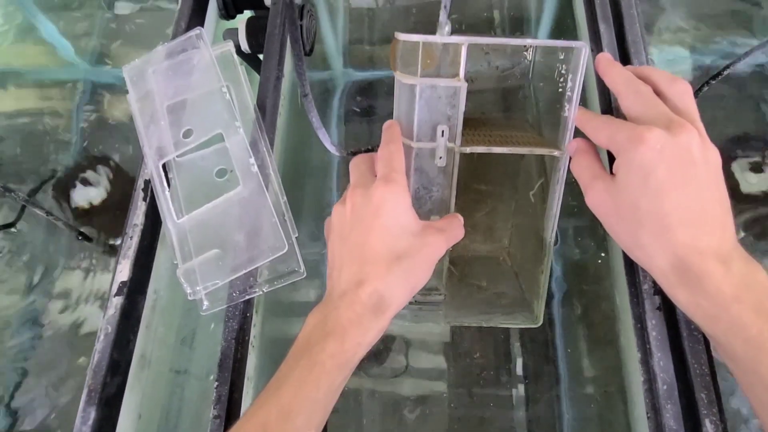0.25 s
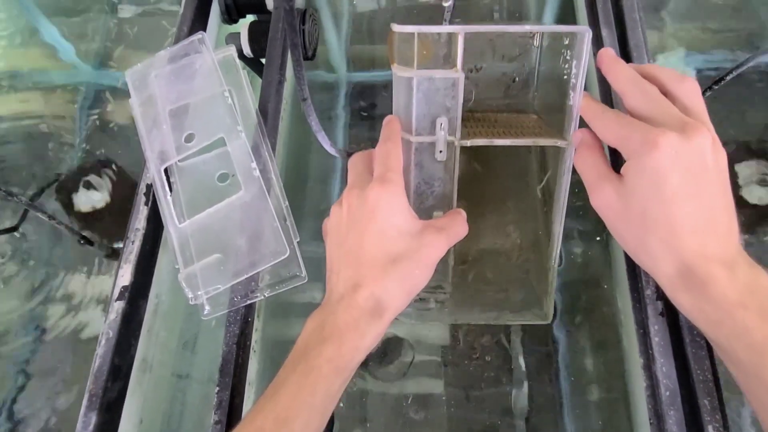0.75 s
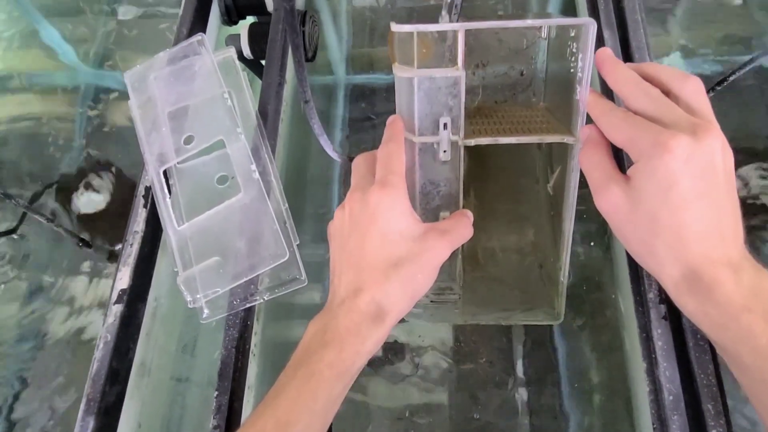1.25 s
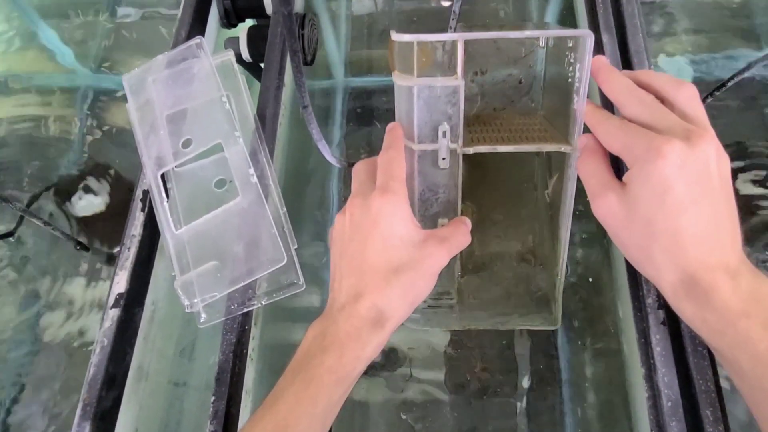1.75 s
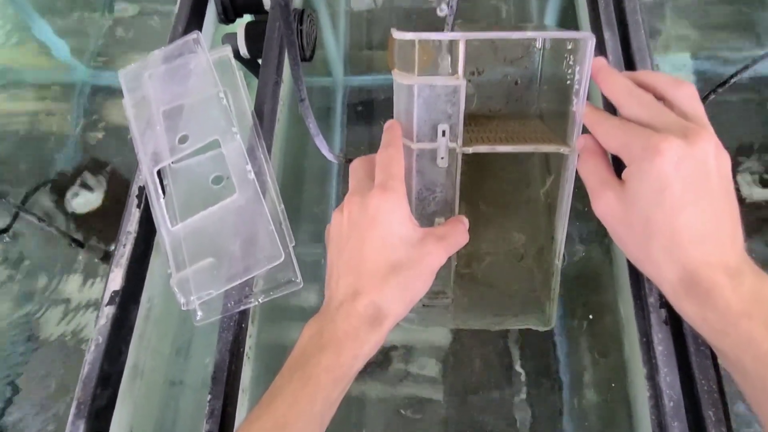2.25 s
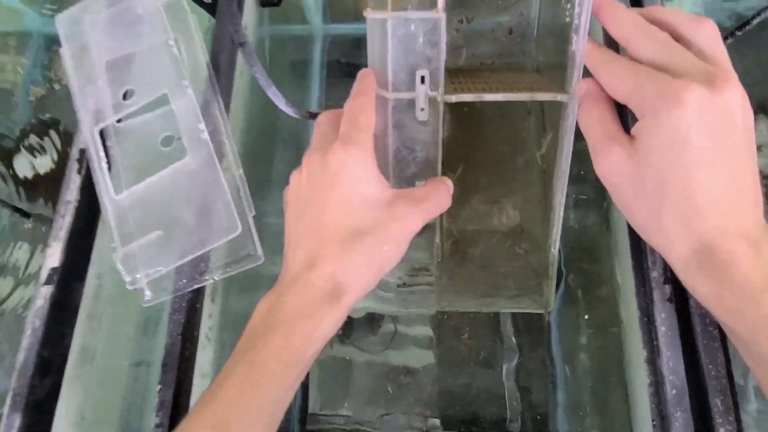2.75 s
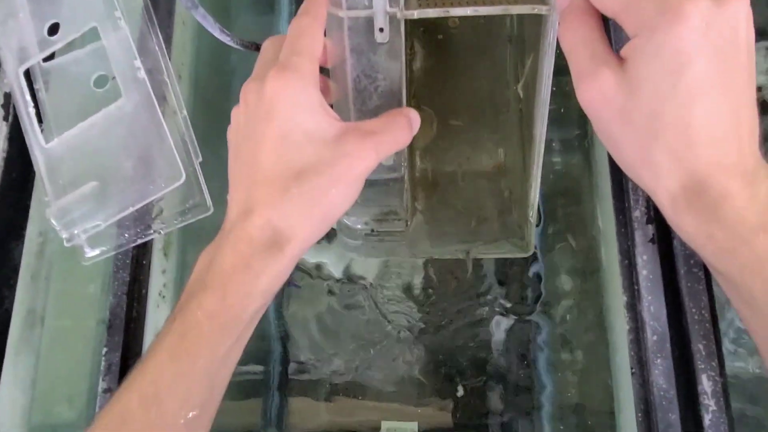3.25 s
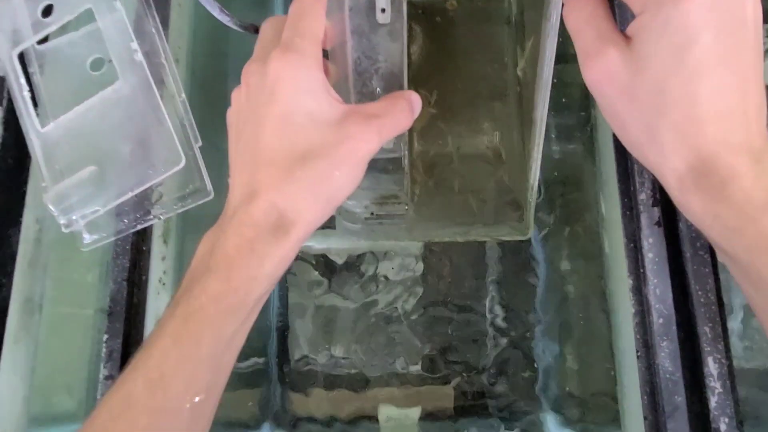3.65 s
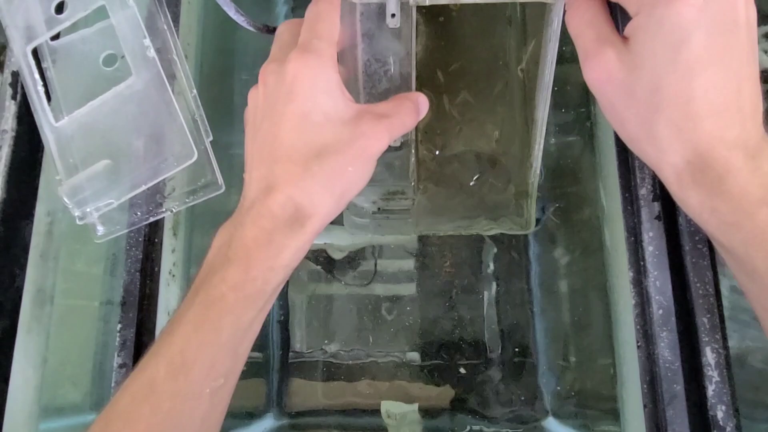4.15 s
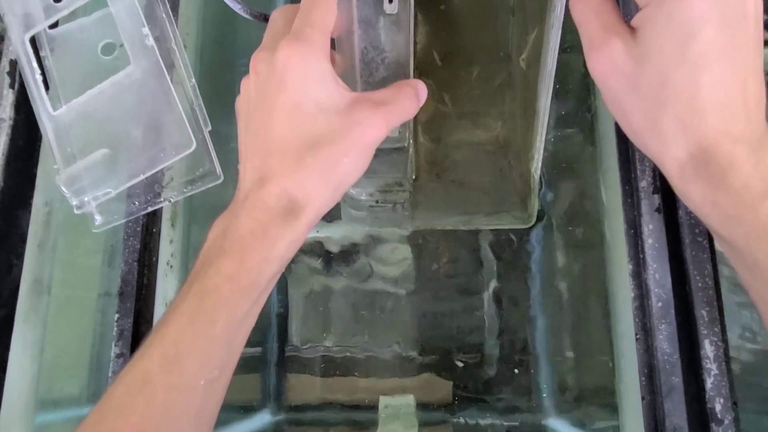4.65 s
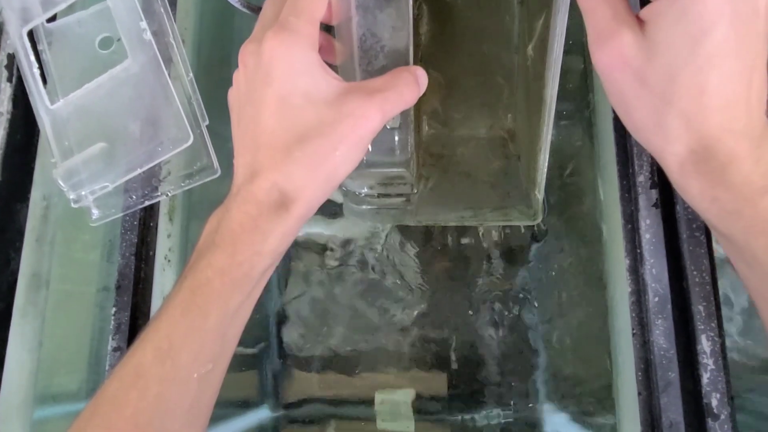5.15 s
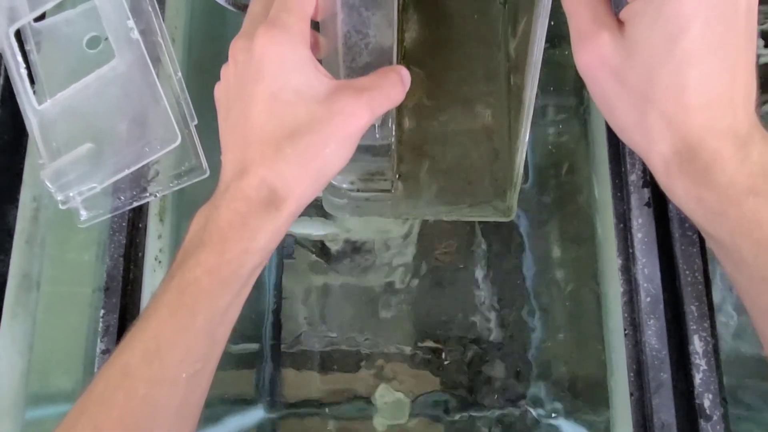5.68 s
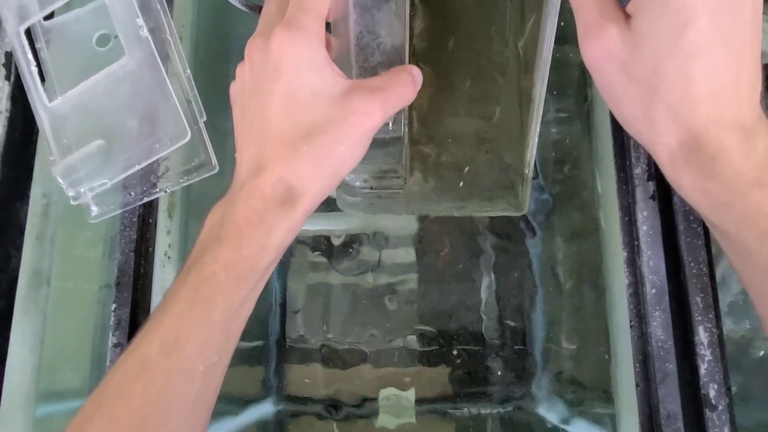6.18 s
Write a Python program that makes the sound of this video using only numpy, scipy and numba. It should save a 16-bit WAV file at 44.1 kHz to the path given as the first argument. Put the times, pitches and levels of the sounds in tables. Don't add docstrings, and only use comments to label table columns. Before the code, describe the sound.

Indoor fish room, stereo handheld microphone near the water. Sputtering gurgles come in short surges with gaps, ringing hollow like air in a pipe, mixed with glugs, plops, slaps and fine ticking spray. After a loud plink and a short near-pause, longer bubbling surges take over and the stream settles, slightly duller as the microphone turns. A constant low machine rumble and soft hiss of distant running tanks lie underneath.

```python
import sys
import numpy as np
from scipy import signal
from scipy.fft import rfft, irfft, next_fast_len
from scipy.io import wavfile
from scipy.ndimage import uniform_filter1d, map_coordinates
from numba import njit

SR = 44100
rng = np.random.default_rng(int(sys.argv[2]) if len(sys.argv) > 2 else 0)


def magnitude_from_level(level_db):
    exponent = np.asarray(level_db, float) / 20
    return 10 ** exponent


def transcribe(u):
    v = np.clip(np.atleast_2d(u).T, -1, 1)
    q = np.round(v * 32767).astype(np.int16)
    wavfile.write(sys.argv[1], SR, q)


N = 283122

# f/Hz, level/dB [per Hz]
ROOM_SPECTRUM = [(88, -53), (150, -19.5), (244, -1), (450, -3.5), (700, -7), (1300, -4), (3500, -14.5),
                 (4500, -21), (5200, -19.5), (7200, -15.5), (10500, -24.5), (12000, -20.5), (13500, -23),
                 (15600, -27)]
# f/Hz, level/dB [per Hz]
RUMBLE_SPECTRUM = [(12, -47), (20, -8), (32, -10), (51, -1), (65, 8.5), (92, 0.5), (117, 0.5), (146, -4),
                   (200, -5), (260, -58), (440, -120)]
# t/s, level/dB
RUMBLE_LEVEL = [(0, -43), (2.8, -41.5), (3.2, -41), (6.42, -41)]
# f/Hz, left-right likeness [-1 to 1]
LIKENESS = [(60, 1), (130, 0.88), (290, 0.89), (640, 0.29), (1410, -1.28), (3100, 0.56), (6820, 0.0093),
            (15000, 0.016)]
# f/Hz, width/Hz, level/dB
MACHINE_TONES = [(59, 1.05, -71), (66.3, 4.76, -53), (115.1, 1.6, -55), (240, 5.71, -56.5)]
# f/Hz, decay time by 60 dB/s
DECAY_TIMES = [(500, 0.46), (2000, 0.25), (8000, 0.02)]
# t/s, extra left lag/samples
CAMERA_TURN = [
    (0, 3.5),
    (2.2, 3.5),
    (3.1, -.5),
    (6.42, -.5),
]
# f/Hz, left lead/rad
PORT_PHASE = [(0, 0), (600, .5), (950, -.3), (1040, 0), (1120, 1.8), (1300, 1.9), (1720, .9), (2410, 2.8),
              (2760, 3.4), (3190, 3.3), (4130, 5.9), (4650, 6.5), (5080, 7.5), (9000, 9)]
# f/Hz, left-right level/dB
BODY_SHADING = [(600, -3), (1100, 0), (2000, -1), (8000, -2)]
# start t/s, length/s, gurgle level/dB, mouth opening as upper-mode level/dB
SURGES = [(0.0, 0.091, -25, -6.5), (0.121, 0.193, -25.5, -9), (0.361, 0.05, -21.5, -21),
          (0.433, 0.062, -44, -25), (.675, .13, -21.5, -13), (0.828, 0.25, -22, -12),
          (1.119, 0.14, -36, -26.5), (1.36, 0.15, -26, -22), (1.492, 0.17, -21, -15),
          (1.679, 0.15, -32, -28), (1.863, .11, -30.5, -13), (1.999, .22, -22.5, -11.5),
          (2.207, 0.055, -29.5, -11), (2.421, 0.12, -33, -4.5), (2.516, .46, -24, -8),
          (2.974, .07, -32.5, -20), (3.15, 0.46, -24, -15), (3.425, 0.14, -23.5, -24.5),
          (3.573, .075, -32, -26), (3.662, 0.46, -23, -13), (3.982, 0.097, -22.5, -22.5),
          (4.091, 0.181, -21.5, -13), (4.305, 0.28, -24, -12.5), (4.435, 0.46, -24, -10.5),
          (4.936, 0.31, -29.5, -16.5), (5.169, 0.074, -19, -17.5), (5.297, 0.23, -24.5, -11.5),
          (5.578, 0.58, -24.5, -8.5), (6.194, 0.16, -26.5, -17), (6.31, .12, -18, -13)]
# t/s, f/Hz
COLUMN_PITCH = [(0.0, 1063), (.3, 960), (1.7, 1005), (1.86, 1144), (2.02, 950), (2.45, 1100), (2.62, 956),
                (3.07, 1119), (3.3, 923), (3.58, 1177), (3.8, 930), (4.05, 1120), (4.25, 988), (4.42, 1102),
                (5.1, 954), (5.21, 1180), (5.5, 1006), (6.42, 1093)]
# t/s, level/dB, f/Hz
PLOPS = [(.124, -19, 1290), (.389, -13, 996), (.677, -12, 1068), (.768, -7.5, 987), (.925, -8, 960),
         (1.167, -13, 1007), (1.223, -38, 1040), (1.286, -10, 1103), (1.371, -13, 1165), (1.386, -18, 1200),
         (1.465, -13, 1276), (1.706, -10.5, 997), (1.745, -19, 940), (1.773, -10, 964), (1.864, -9, 1194),
         (1.912, -10, 1270), (2.328, -32, 1160), (3.034, -6.5, 1086), (3.1, -7, 1135), (3.499, -13, 1140),
         (3.522, -26, 1130), (3.575, -29, 1120), (3.621, -12.5, 1136), (3.967, -6, 1161),
         (4.058, -1.5, 1123), (4.418, -5.5, 1124), (5.181, -8.5, 1097), (5.294, -7, 1083),
         (5.313, -4.5, 1134), (6.244, -13, 970)]
# t/s, level/dB, f/Hz
TRAPPED = [(.389, -21.5, 1965), (0.676, -21.5, 1890), (.925, -26, 2010), (.977, -17, 2230),
           (1.127, -24, 2750), (1.167, -24.5, 1860), (1.224, -32, 2100), (1.314, -25, 1876),
           (1.37, -24.5, 1810), (1.386, -21.5, 2440), (1.465, -23.5, 2074), (1.681, -19.5, 1820),
           (1.706, -24.5, 1710), (1.774, -21, 1740), (1.888, -22.5, 1960), (1.935, -20, 1840),
           (1.996, -26, 2390), (3.034, -18.5, 2090), (3.1, -21.5, 2410), (3.16, -14, 2360),
           (3.436, -18, 2010), (3.522, -29, 1930), (3.575, -31, 1930), (3.674, -14.5, 2440),
           (3.967, -16, 2145), (4.058, -20, 1873), (4.418, -11, 2050), (5.254, -26.5, 1870),
           (5.294, -19.5, 2050), (5.694, -18.5, 2360)]
# t/s, level/dB
SLAPS = [(.275, -20), (.729, -16), (.877, -14), (.925, -9.5), (1.223, -26.5), (1.465, -25), (1.888, -23.5),
         (1.933, -22), (1.996, -22), (2.421, -21), (3.09, -22), (3.11, -26), (3.674, -17), (3.967, -32),
         (4.091, -9.5), (4.164, -14.5), (4.44, -16), (5.349, -11.5), (5.588, -31), (5.694, -10.5),
         (6.244, -17.5), (6.328, -29)]
# t/s, peak level/dB
SPITS = [(0.094, -29.5), (0.485, -34.5), (0.747, -34), (0.831, -32), (0.8764, -37), (0.9333, -30),
         (1.0889, -44), (1.4957, -32.5), (2.51, -48), (2.5884, -29), (3.208, -27), (3.79, -27),
         (4.014, -31), (4.0862, -27), (4.146, -23), (4.247, -29), (4.3216, -24.5), (5.5852, -45),
         (5.6535, -35), (5.701, -31)]
# f/Hz, level/dB [per Hz]
SPRAY_SPECTRUM = [(4000, 0), (5500, 0), (6800, -5), (8700, 8), (10000, -5.5), (12000, -3), (15500, -14)]
# t/s, peak level/dB, f/Hz
DRIPS = [
    (1.262, -14.5, 4400),
    (1.345, -23, 4700),
    (3.601, -17, 4100),
]
# f/Hz, width/Hz, level/dB
PIPE_MODES = [(985, 45, -1), (1127, 36, 1)]
# t/s, share [0-1]
PIPE_SHARE = [
    (0, .4),
    (4.15, .6),
    (4.45, .9),
    (6.42, .9),
]
# f/Hz, width/Hz, level/dB
MOUTH_MODES = [(1650, 250, -10), (1870, 100, -5), (2060, 150, -4.5), (2250, 90, 1), (2450, 130, 2)]
# f/Hz, width/Hz, level/dB
UPPER_MODES = [(2850, 350, -13), (3340, 85, 0), (3470, 75, -1), (3610, 70, -8)]
# f/Hz, width/Hz, level/dB
THROAT_MODES = [(2750, 510, -5.5), (3120, 140, -2.5)]
# f/Hz, width/Hz, level/dB
CHAMBER_MODES = [(1283.5, 64, 0)]
# f/Hz, width/Hz, level/dB
TANK_MODES = [(572, 145, -1.5), (723, 317, -0.5)]
# f/Hz, width/Hz, level/dB
RIM_MODES = [(3960, 170, 3.5), (4400, 320, 0), (4695, 210, 3)]
GLUG_S = .047


def unit(x):
    return x / np.sqrt(np.mean(x ** 2) + 1e-20)


def along(points, hz):
    f, v = np.transpose(points)
    return np.interp(np.log(hz + 1), np.log(f + 1), v)


def curves(rows):
    t, *columns = np.transpose(rows)
    return [np.interp(np.arange(N) / SR, t, c) for c in columns]


def wobble(rate):
    knots = rng.standard_normal(int(N * rate / SR) + 4)
    return map_coordinates(knots, [np.arange(N) * rate / SR])


def filtered(x, response):
    m = next_fast_len(N + SR // 2)
    return irfft(rfft(x, m) * response(np.fft.rfftfreq(m, 1 / SR)), m)[..., :N]


def rush(spectrum, alike, patchy_db):
    z = signal.stft(rng.standard_normal((2, N)), nperseg=512)[2]
    field = uniform_filter1d(rng.standard_normal(z.shape[1:]), size=6, axis=0)
    field = uniform_filter1d(field, size=10, axis=1)
    pair = signal.istft(z * magnitude_from_level(patchy_db * unit(field)), nperseg=512)[1][:, :N]

    def mid_side(hz):
        angle = np.arccos(np.clip(along(alike, hz), -1, 1)) / 2
        return magnitude_from_level(along(spectrum, hz)) * [np.cos(angle), np.sin(angle)]

    mid, side = filtered(pair, mid_side)
    return unit(np.array([mid + side, mid - side]))


def machine_hum():
    t, out = np.arange(N) / SR, np.zeros(N)
    for hz, width_hz, db in MACHINE_TONES:
        level = magnitude_from_level(db + 6.5 + 1.1 * wobble(3.47))
        drift = np.cumsum(width_hz * wobble(12)) / SR / 2
        out += level * np.sin(2 * np.pi * (hz * t + drift))
    return out


def background():
    far = magnitude_from_level(-38 + 0.1 * wobble(2.5)) * rush(ROOM_SPECTRUM, LIKENESS, patchy_db=.9)
    rumble = magnitude_from_level(curves(RUMBLE_LEVEL)[0] - 1.0) * rush(RUMBLE_SPECTRUM, LIKENESS, patchy_db=-0.6)
    return (far + rumble + machine_hum()) * magnitude_from_level([[-.7], [.7]])


def echo(x):
    hz, t, z = signal.stft(rng.standard_normal((2, SR // 2)), SR, nperseg=256)
    decay = magnitude_from_level(-60 * t / along(DECAY_TIMES, hz)[:, None])
    tail = signal.istft(z * decay, SR, nperseg=256)[1]
    delayed = np.pad(x, (150, 0))[None]
    return signal.fftconvolve(delayed, tail / np.linalg.norm(tail[0]), axes=1)[:, :N]


def placed(x):
    lead, = curves(CAMERA_TURN)
    pan_db = -0.4 - 0.55 * lead

    def ports(hz):
        difference = 1j * along(PORT_PHASE, hz) + np.log(magnitude_from_level(along(BODY_SHADING, hz)))
        return np.exp(.5 * np.outer([1, -1], difference))

    pair = filtered(np.array([x, x]), ports)
    pair = [map_coordinates(v, [np.arange(N) - k * lead / 2], order=3) for v, k in zip(pair, (1, -1))]
    return pair * magnitude_from_level(np.outer([.5, -.5], pan_db))


def bursts(rows, fade_s):
    rows = np.array(rows)
    jumps = np.bincount((rows[:, 0] * SR).astype(int), magnitude_from_level(rows[:, 1]), N)[:N]
    return signal.lfilter([1], [1, -np.exp(-1 / (fade_s * SR))], jumps)


def noise_bursts(rows, fade_s):
    return bursts(rows, fade_s) * rng.standard_normal(N)


def sputter(per_s, spread_db, fade_s, steady):
    when, size = rng.random((2, int(per_s * N / SR)))
    puffs = np.c_[when * N / SR, -spread_db * np.log(size + .03)]
    return unit((steady + unit(bursts(puffs, fade_s))) * rng.standard_normal(N))


def choke(mouth_db):
    return np.clip((-19.5 - mouth_db) / 4, 0, 1)


def surging():
    start, length, db, mouth_db = np.transpose(SURGES)[:, :, None]
    t = np.arange(0, N, 32) / SR
    attack_db = 2500 * np.maximum(start - t, 0)
    release_db = 504 * np.maximum(t - start - length, 0)
    held = db - attack_db - release_db
    glug_fall = .5 - np.clip(t - start, 0, length) / GLUG_S % 1
    each = held + 16 * choke(mouth_db) * glug_fall
    level_db = np.maximum(each.max(0), -48.5)
    opening_db = uniform_filter1d(mouth_db[held.argmax(0), 0], size=30)
    return curves(np.c_[t, level_db, opening_db])


def spray():
    low_db, top_db = surging()
    ticks = sputter(per_s=40, spread_db=3.5, fade_s=.004, steady=.1)
    hiss = magnitude_from_level(0.58 * (low_db + top_db) - 33.5) * ticks + magnitude_from_level(-1.5) * noise_bursts(SPITS, .005)
    return filtered(hiss, lambda hz: magnitude_from_level(along(SPRAY_SPECTRUM, hz)) * (hz > 3500))


def bubbles(rows, cycles, rise, attack_s):
    out, t = np.zeros(N + SR), np.arange(SR // 20) / SR
    for s, db, hz in rows:
        swell = magnitude_from_level(db - 60 * t * hz / cycles) * (1 - np.exp(-t / attack_s))
        out[round(s * SR):][:len(t)] += swell * np.sin(2 * np.pi * hz * t * (1 + rise * t * hz / cycles))
    return out[:N]


def drips():
    return bubbles(DRIPS, cycles=60, rise=.12, attack_s=.001)


def glug_bubbles():
    rows = []
    for s, length, db, mouth_db in SURGES:
        flooded = choke(mouth_db)
        for k in range(5):
            if k * GLUG_S < length and flooded:
                level_db = db + 6 + 2 * rng.standard_normal() - 30 * (1 - flooded)
                rows.append((s + k * GLUG_S + .004, level_db, 2050 * np.exp(.11 * rng.standard_normal())))
    return bubbles(rows, cycles=94, rise=0.156, attack_s=0.0038)


def modes(table):
    def response(f):
        total = 0
        for k, (centre, width, db) in enumerate(table):
            damping = 1j * f * width
            total = total + (-1) ** k * magnitude_from_level(db) * damping / (centre * centre - f * f + damping)
        return total
    return response


@njit
def moving(x, turn, keep):
    y = np.zeros(len(x))
    for i in range(2, len(x)):
        y[i] = x[i] - x[i - 2] + 2 * keep * np.cos(turn[i]) * y[i - 1] - keep * keep * y[i - 2]
    return y


def column(x, hz, width_hz):
    turn, keep = 2 * np.pi * hz / SR, np.exp(-np.pi * width_hz / SR)
    return unit(moving(moving(x, turn, keep), turn, keep ** 3))


def gurgle():
    (low_db, top_db), (low_hz,) = surging(), curves(COLUMN_PITCH)
    throat = magnitude_from_level(low_db - 18.5) * choke(top_db) * rng.standard_normal(N)
    throat += magnitude_from_level(-8.5) * noise_bursts(TRAPPED, 0.0073)
    low_db, top_db = low_db + 1.1 * wobble(12), top_db + 1.5 * wobble(14)
    mid_db = -2 + 0.67 * top_db
    mid_hz = 2393 + 15.5 * top_db + 70 * wobble(12)

    flow = sputter(per_s=150, spread_db=-3.5, fade_s=0.0067, steady=2.6)
    fine = sputter(per_s=150, spread_db=-5.5, fade_s=0.0032, steady=0.6)
    ticks = sputter(per_s=45, spread_db=3.5, fade_s=.004, steady=.25)

    def slug(rows, db):
        return magnitude_from_level(db) * noise_bursts(rows, 0.0092)

    turn, = curves(CAMERA_TURN)
    low = magnitude_from_level(low_db - 3.5) * flow + slug(PLOPS, -11.5)
    deep = magnitude_from_level(0.54 * low_db - 26.0) * flow + slug(PLOPS, -27.5)
    side_db = -38.5 + 0.61 * turn + 1.76 * wobble(6) + 0.33 * (low_db + 21)
    side = magnitude_from_level(side_db) * fine + slug(PLOPS, -17.5)
    mid_level = magnitude_from_level(low_db + mid_db - 2.0 + .6 * wobble(29))
    mid = mid_level * (1.2 * flow + 1.3 * fine) + slug(TRAPPED, -5.5)
    top_level = magnitude_from_level(low_db + top_db + 0.5 + 1.0 * wobble(22))
    top = top_level * (0.93 * fine + 0.52 * flow) + slug(SLAPS, -5.0)
    rim = magnitude_from_level(0.89 * (low_db + top_db) - 18.0) * ticks + slug(SLAPS, -19)
    rim = magnitude_from_level(2.2 * turn) * rim

    ripple = 1 + 0.011 * wobble(30)
    first = curves(PIPE_SHARE)[0] * unit(filtered(low, modes(PIPE_MODES)))
    first = first + column(low, low_hz * ripple, 36)
    second = 1.15 * unit(filtered(mid, modes(MOUTH_MODES))) + column(mid, mid_hz * ripple, 80)
    out = unit(first) * np.std(low) + unit(second) * np.std(mid)
    for drive, table in ((deep, TANK_MODES), (side, CHAMBER_MODES), (top, UPPER_MODES),
                         (rim, RIM_MODES), (throat, THROAT_MODES)):
        out = out + unit(filtered(drive, modes(table))) * np.std(drive)

    out = out + magnitude_from_level(1.5) * bubbles(PLOPS, cycles=45.3, rise=0.075, attack_s=0.0047)
    out = out + glug_bubbles() + magnitude_from_level(4) * bubbles(TRAPPED, cycles=99, rise=0.14, attack_s=0.0006)
    low_pass = signal.butter(8, 4950, fs=SR, output="sos")
    return signal.sosfilt(low_pass, out)


def scene():
    water, mist = gurgle() + drips(), spray()
    haze = magnitude_from_level(2) * echo(mist)
    wet = magnitude_from_level(-13) * echo(water)
    return magnitude_from_level(0.5) * placed(water + mist) + wet + haze + background()


def band_limit(x):
    return signal.sosfilt(signal.butter(12, 15710, fs=SR, output="sos"), x)


def record(dry):
    top = .62
    return band_limit(top * np.tanh(dry / top))


dry = scene()
out = record(dry)
transcribe(out)
```